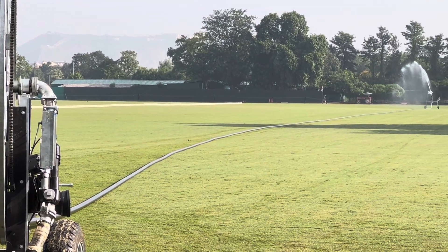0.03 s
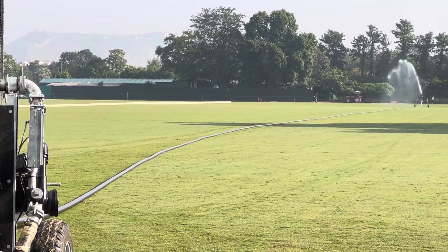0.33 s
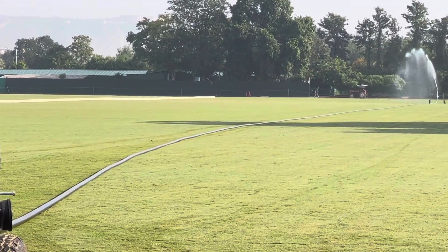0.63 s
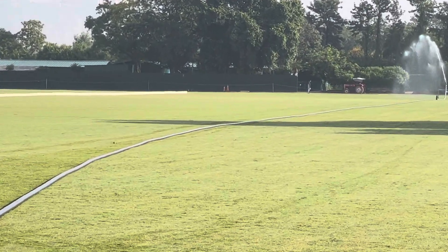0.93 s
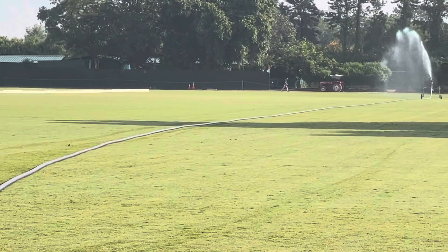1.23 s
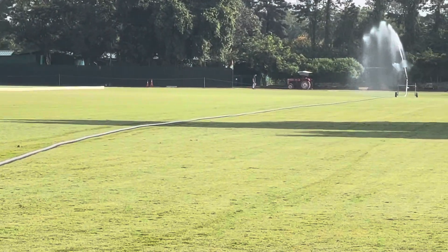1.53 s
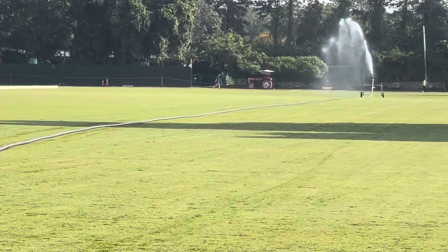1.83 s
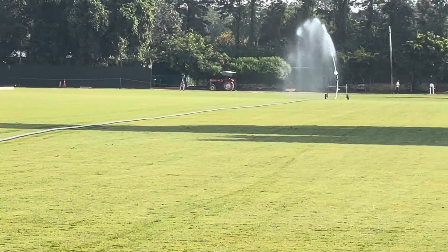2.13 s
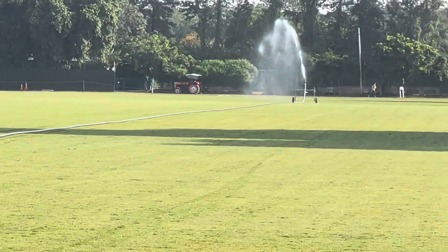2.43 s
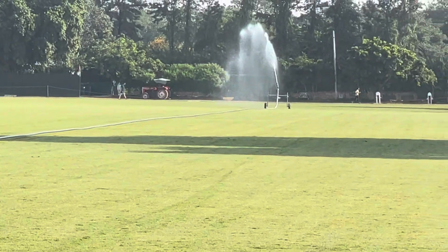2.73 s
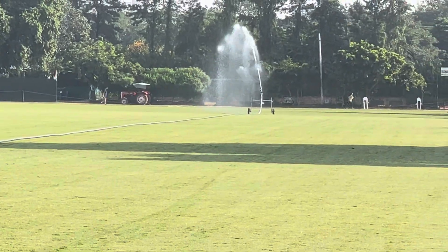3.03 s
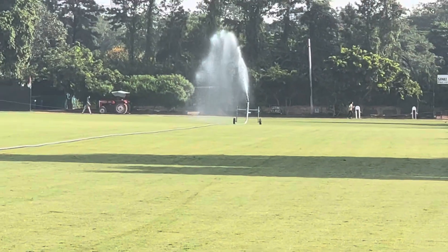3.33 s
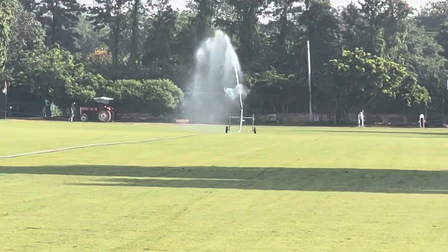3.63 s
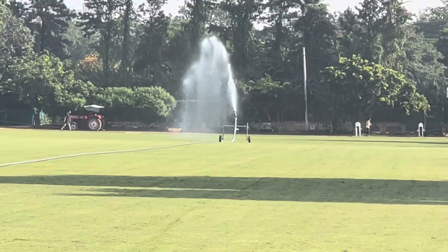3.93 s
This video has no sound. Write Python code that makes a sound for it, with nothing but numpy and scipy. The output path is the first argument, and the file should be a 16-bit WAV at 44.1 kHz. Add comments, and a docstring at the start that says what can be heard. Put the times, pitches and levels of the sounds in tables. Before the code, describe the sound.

The steel catch of an irrigation hose reel clacks twice, about two seconds apart, each time ringing with a low boom. Behind these close hits, a diesel pump drones and water rushes and hisses on an open field.

```python
"""The steel pawl of an irrigation hose reel drops off its ratchet twice as the reel winds in on an
open field. Each drop snaps, bounces once, rings the steel and sets the drum booming. Behind it a
diesel pump engine drones with a thin whine and water rushes through the pipes under a hiss of spray.
A few faint ticks and a rustle come from close by, thin chirps from far off."""
import sys
import numpy as np
from scipy import signal
from scipy.fft import rfft, irfft, next_fast_len
from scipy.io import wavfile
from scipy.ndimage import uniform_filter1d, map_coordinates

SR = 44100
rng = np.random.default_rng(int(sys.argv[2]) if len(sys.argv) > 2 else 0)


def generate_wav(sig):
    """Save sig (samples, or channels by samples) to the path in sys.argv[1] as 16-bit PCM at SR."""
    pcm = np.round(np.clip(np.atleast_2d(sig).T, -1, 1) * 32767).astype(np.int16)
    wavfile.write(sys.argv[1], SR, pcm)


N = 176400

# stereo image of the reel and other close sounds: freq_hz, left_right_correlation
CLOSE_IMAGE = [(300, .93), (480, .93), (700, 0.44), (1300, 0.79), (2300, 1), (3200, 0.94), (4400, 0.98),
               (6500, 1), (8200, 0.61), (10000, 0.15), (13500, 0.82)]
# stereo image of the engine and water bed: freq_hz, left_right_correlation
BED_IMAGE = [(60, 0.97), (100, 0.99), (160, 0.67), (270, 0.34), (450, 0.27), (740, -0.51), (1220, -0.25),
             (1800, 0.84), (2300, 1), (3200, 0.93), (4500, 1), (5600, 1), (7000, 1), (8200, -0.26),
             (11000, -1.04), (13000, 0.98)]


def pawl():
    """The pawl snaps down, bounces once, rings at both contacts and makes the drum boom."""
    # drops off the ratchet, with each layer's gain relative to its drop:
    # start_s, level_db, snap_db, steel_db, bounce_db, bounce_tilt_db_per_octave, drum_db, drum_hold_s
    drops = [(0.29, -29, -9.5, -4, -5.5, -1.5, -5, 0.088), (2.354, -30, -5.5, -1.5, -5, -4.5, -3, 0.06)]
    attack_s, bounce_delay_s, bounce_attack_s = 0.0077, 0.055, 0.013
    tilt_hz, bounce_ring_db = 2940, -16.5  # the softer bounce loses treble and rings less
    out = np.zeros((2, N))
    for start_s, level_db, snap_db, steel_db, bounce_db, tilt_db, drum_db, drum_hold_s in drops:
        bounce_s = start_s + bounce_delay_s
        snap = amp(snap_db) * contact_snap(start_s)
        bounce = filtered(steel_clash(bounce_s, bounce_attack_s),
                          lambda hz: amp(bounce_db + tilt_db * np.log2(np.maximum(hz / tilt_hz, 1))))
        first_ring = steel_ring(start_s, attack_s, hold_s=0.006, spread_rad=0.11)
        bounce_ring = steel_ring(bounce_s, bounce_attack_s, hold_s=0, spread_rad=0.2)
        steel = amp(steel_db) * (first_ring + amp(bounce_ring_db) * bounce_ring)
        drum = amp(drum_db) * drum_boom(start_s, drum_hold_s)
        out += amp(level_db) * (snap + steel_clash(start_s, attack_s) + bounce + steel + drum)
    return out


def contact_snap(start_s):
    """A bright burst of noise as the pawl first lands."""
    # colour of the snap: freq_hz, level_db
    colour = [(1200, -38), (2400, -11), (3000, 6.5), (3800, 10.5), (4400, 1), (5200, 1), (6400, -6),
              (7600, -1.5), (8700, -20.5), (10500, -69), (12500, -31), (16000, -28)]
    burst = envelope(start_s, attack_s=0.0055, hold_s=0.008, t60_s=0.19)
    return burst * noise(colour, CLOSE_IMAGE, patchy_db=4)


def steel_clash(start_s, attack_s):
    """Steel hits steel: gritty noise whose treble dies first."""
    # colour of the clash: freq_hz, level_db
    colour = [(200, -2), (330, -9), (600, 2.5), (800, -2.5), (1200, 1), (1800, -4.5), (2450, 0),
              (3000, 3.5), (3400, -4), (3850, -6.5), (4400, -11.5), (5150, -1.5), (5700, -11),
              (6500, -18.5), (7600, -8.5), (8700, -11.5), (10000, -34), (12000, -18.5), (16000, -45)]
    # decay across the spectrum: freq_hz, t60_s
    decay = [(400, 0.52), (1200, 0.56), (3000, 0.37), (5200, 0.33), (8000, 0.2), (14000, 0.21)]
    hz, t, bands = signal.stft(noise(colour, CLOSE_IMAGE, patchy_db=1), SR, nperseg=256)
    fade = np.exp(-np.log(1000) * np.maximum(t - start_s - attack_s, 0) / curve(decay, hz)[:, None])
    tail = signal.istft(bands * fade, SR, nperseg=256)[1][:, :N]
    rise = np.clip((clock() - start_s) / attack_s, 0, 1)
    grit = unit(amp(1.5 * wobble(350)))
    return tail * rise * grit


def steel_ring(start_s, attack_s, hold_s, spread_rad):
    """The struck pawl rings in a cluster of high modes."""
    # modes of the pawl: pitch_hz, level_db, t60_s
    modes = [(2277, -17, .4), (2460, -21, .4), (2654, -15, .3), (2684, -16, .46), (2805, -14, .38),
             (2982, -10.5, .42), (3107, -14, .4), (3565, -16, .36), (3704, -20, .33), (3869, -20, .33),
             (4893, -23, .38), (4974, -25, .35), (5157, -23, .3), (5405, -23, .33), (7208, -28, .25),
             (7337, -28, .28), (7687, -26, .28)]
    return ring(modes, start_s, attack_s, hold_s, spread_rad, blur_cycles=0.043)


def drum_boom(hit_s, hold_s):
    """The reel's drum answers just after the hit with a low boom."""
    # modes of the drum: pitch_hz, level_db, t60_s
    modes = [(250, -17, .38), (293, -12.5, .55), (336, -7, .44), (354, -9, .4), (378, -4.5, .72),
             (393, -6, .35), (417, -12, .35), (455, -6, .44), (470, -8.5, .38), (510, -17, .35),
             (587, -15, .35), (645, -20, .35), (795, -17, .3)]
    return ring(modes, hit_s + 0.0062, attack_s=0.0045, hold_s=hold_s, spread_rad=0.34, blur_cycles=0.09)


def engine():
    """Diesel drone: exhaust harmonics locked to the engine speed, over an uneven rumble."""
    # four-stroke engine speed: time_s, cycle_rate_hz
    speed = [(0, 8.84), (0.8, 9.22), (1.3, 8.94), (2.5, 9.15), (4, 9.3)]
    # exhaust harmonics: order (rounded to a whole multiple of the cycle rate), start_db, end_db
    harmonics = [(4, -62, -65), (6.1, -49, -58), (7, -47, -58), (8, -34, -34.5), (9, -35.5, -43.5),
                 (11.1, -44, -47), (12, -39.5, -44.5), (15.7, -43.5, -45), (18, -79, -51),
                 (20, -52.5, -52.5), (23.2, -65.5, -51), (28, -73, -50)]
    # swell of the drone: time_s, gain_db
    swell = [(0, 0), (0.25, -1.5), (0.6, 0.5), (0.798, -1), (1.45, 0.5), (1.65, 0.5), (1.87, 2),
             (2.0, -1.5), (2.3, 0.5), (2.8, -2.5), (3.3, -2), (3.55, 0.5), (3.75, 2), (4, -2.5)]
    # colour of the rumble: freq_hz, level_db
    rumble_colour = [(15, -56), (27, -28), (34, -7), (55, 0), (78, 2), (100, -5), (135, -1), (170, -7.5),
                     (230, -9), (320, -16.5), (500, -31.5), (1200, -82)]
    cycles = np.cumsum(automation(speed)) / SR
    swell_db = automation(swell)
    exhaust = np.zeros((2, N))
    for order, start_db, end_db in harmonics:
        gain = amp(np.linspace(start_db, end_db, N) + swell_db + 1.3 * wobble(9))
        waver_rad = 0.1 * wobble(5.8)
        exhaust += gain * tone(round(order) * cycles + waver_rad / (2 * np.pi), spread_rad=0.019 * order)
    rumble = amp(-38.5 + 0.053 * swell_db) * noise(rumble_colour, BED_IMAGE, patchy_db=1.5)
    return exhaust + rumble


def pump():
    """Thin pump whines, fuzzy with turbulence."""
    # whines: pitch_hz, start_db, end_db, spread_rad, blur_cycles
    whines = [(826, -47.5, -64.5, 2.24, 0.31), (981, -66, -51.5, 1.49, 0.1), (1993, -63, -63, .3, 0.32)]
    out = np.zeros((2, N))
    for pitch_hz, start_db, end_db, spread_rad, blur_cycles in whines:
        gain = amp(np.linspace(start_db, end_db, N) + 0.95 * wobble(18))
        out += gain * tone(pitch_hz * clock() + blur_cycles * wobble(35), spread_rad)
    return out


def water():
    """Water rushes through the pipes and excites a resonance that swells and sinks."""
    # colour of the rush: freq_hz, level_db
    rush_colour = [(100, -16), (250, -3.5), (480, 2), (700, 2), (1000, 4), (1450, -2.5), (1950, -5),
                   (2450, -5), (3000, -12), (3600, -12), (4300, -23.5), (8000, -51), (16000, -71)]
    # swell of the rush: time_s, gain_db
    swell = [(0, 1.3), (.7, 0.4), (1.25, -0.1), (1.8, -.5), (2.3, 1), (3, 1), (3.5, -.5), (4, 0)]
    # pipe resonance: freq_hz, level_db
    pipe_colour = [(1400, -29), (1750, 1), (1930, 3), (2150, -7), (2900, -11), (3800, -33)]
    # swell of the resonance: time_s, level_db
    pipe_level = [(0, -62), (.9, -57), (1.25, -54), (1.55, -58.5), (1.9, -62), (3.1, -63), (3.55, -55.5),
                  (4, -56)]
    rush_db = -44 + automation(swell) + 0.16 * wobble(5.63)
    rush = amp(rush_db) * noise(rush_colour, BED_IMAGE, patchy_db=1)
    pipe = amp(automation(pipe_level)) * noise(pipe_colour, BED_IMAGE, patchy_db=1)
    return rush + pipe


def spray():
    """A fine hiss of spray with a slight flutter."""
    # colour of the hiss: freq_hz, level_db
    colour = [(1500, -20), (3000, 0), (5000, 0), (6500, -2), (8400, -3.5), (9600, -14), (12000, -13),
              (14500, -14), (16000, -17)]
    # rise and fall of the hiss: time_s, level_db
    level = [(0, -62.5), (.8, -59), (1.6, -58), (2.4, -59.5), (3.1, -61), (4, -65.5)]
    flutter_db = 0.6 * wobble(23)
    return amp(automation(level) + flutter_db) * noise(colour, BED_IMAGE, patchy_db=0.7)


def ticks():
    """Faint, short ticks of noise close by."""
    # ticks: start_s, level_db, t60_s
    hits = [(1.152, -46, 0.1), (1.469, -47, 0.082), (2.159, -47, 0.35), (2.703, -46.5, 0.18),
            (2.824, -49.5, 0.086), (3.431, -49.5, 0.07), (3.518, -50.5, 0.071)]
    # colour of the ticks: freq_hz, level_db
    colour = [(500, -8), (1500, 7), (3200, 5), (5000, -7), (8000, -9), (11000, -33), (16000, -21)]
    bursts = sum(amp(level_db) * envelope(start_s, attack_s=0.0059, hold_s=0.0065, t60_s=t60_s)
                 for start_s, level_db, t60_s in hits)
    return bursts * noise(colour, CLOSE_IMAGE, patchy_db=1.5)


def rustle():
    """One soft, airy rustle close by, near the end."""
    # colour of the rustle: freq_hz, level_db
    colour = [(1000, -11), (3500, -4), (8000, -4), (11000, -19), (16000, -5)]
    burst = envelope(start_s=3.815, attack_s=0.015, hold_s=0.028, t60_s=0.22)
    return amp(-56.5) * burst * noise(colour, CLOSE_IMAGE, patchy_db=1.5)


def chirps():
    """Thin far-off bird chirps, made raspy by fast phase jitter."""
    # chirps: start_s, hold_s, pitch_hz, level_db, rasp_cycles
    notes = [(2.975, 0.0052, 11750, -79, 1.1), (3.245, 0.016, 11750, -74, 1.1),
             (3.252, 0.062, 3160, -64, .13), (3.294, 0.043, 3190, -58, .13), (3.315, .005, 11750, -78, 1.1)]
    return sum(amp(level_db) * envelope(start_s, attack_s=0.012, hold_s=hold_s, t60_s=0.15)
               * tone(pitch_hz * clock() + rasp_cycles * wobble(170), spread_rad=0.1)
               for start_s, hold_s, pitch_hz, level_db, rasp_cycles in notes)


def ring(modes, start_s, attack_s, hold_s, spread_rad, blur_cycles):
    """Damped modes of a struck body, each a little random in level and unsteady in phase."""
    return sum(amp(level_db + rng.normal(0, 1)) * envelope(start_s, attack_s, hold_s, t60_s)
               * tone(pitch_hz * clock() + blur_cycles * wobble(45), spread_rad)
               for pitch_hz, level_db, t60_s in modes)


def noise(colour, image, patchy_db):
    """Coloured stereo noise of rms 1, with patches of random gain across time and frequency."""
    def mid_side_gains(hz):
        width_rad = np.arccos(np.clip(curve(image, hz), -0.999, 0.999)) / 2
        return amp(curve(colour, hz)) * np.array([np.cos(width_rad), np.sin(width_rad)])

    bands = signal.stft(rng.standard_normal((2, N)), nperseg=512)[2]
    patches = uniform_filter1d(rng.standard_normal(bands.shape[1:]), size=6, axis=0)
    patches = uniform_filter1d(patches, size=12, axis=1)
    pair = signal.istft(bands * amp(patchy_db * unit(patches)), nperseg=512)[1][:, :N]
    mid, side = filtered(pair, mid_side_gains)
    return unit(np.array([mid + side, mid - side]))


def tone(cycles, spread_rad):
    """A stereo sine of rms 1 with a phase gap between the ears."""
    phase = 2 * np.pi * (cycles + rng.random())
    return np.sqrt(2) * np.sin(phase + spread_rad * np.array([[0.5], [-0.5]]))


def envelope(start_s, attack_s, hold_s, t60_s):
    """Linear rise, hold, exponential release."""
    t = clock() - start_s
    release = np.exp(-np.log(1000) * np.maximum(t - attack_s - hold_s, 0) / t60_s)
    return np.clip(t / attack_s, 0, 1) * release


def filtered(x, response):
    """Equalise x with a gain given as a function of frequency."""
    size = next_fast_len(N + SR // 2)
    return irfft(rfft(x, size) * response(np.fft.rfftfreq(size, 1 / SR)), size)[..., :N]


def wobble(rate_hz):
    """A smooth random curve with rate_hz knots a second."""
    return map_coordinates(rng.standard_normal(8192), [clock() * rate_hz + 2], mode="wrap")


def automation(points):
    """Straight ramps through (time_s, value) points."""
    return np.interp(clock(), *np.transpose(points))


def curve(points, hz):
    """Read (freq_hz, value) points along a log frequency axis."""
    freqs, values = np.transpose(points)
    return np.interp(np.log(hz + 1), np.log(freqs + 1), values)


def clock():
    """The time of each sample in seconds."""
    return np.arange(N) / SR


def amp(db):
    """Decibels to gain."""
    return 10 ** (np.asarray(db) / 20)


def unit(x):
    """Scale to rms 1."""
    return x / np.sqrt(np.mean(x ** 2) + 1e-20)


def scene():
    """The pawl and the small sounds over a bed of engine and water that leans slightly right."""
    balance = amp([[-0.41], [0.41]])
    bed = engine() + pump() + water() + spray()
    return bed * balance + pawl() + ticks() + rustle() + chirps()


def record(dry):
    """A steep high cut takes off the very top of the treble."""
    cutoff_hz = 15750
    return filtered(dry, lambda hz: hz < cutoff_hz)


dry = scene()
out = record(dry)
generate_wav(out)
```